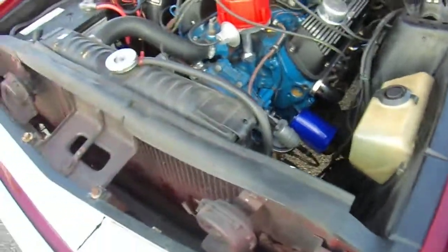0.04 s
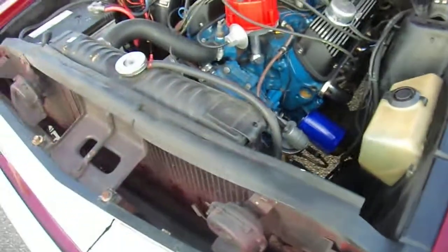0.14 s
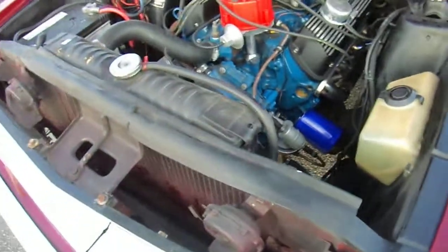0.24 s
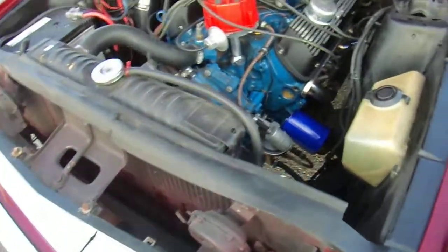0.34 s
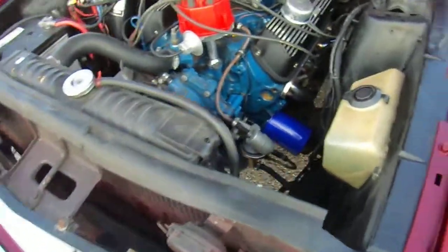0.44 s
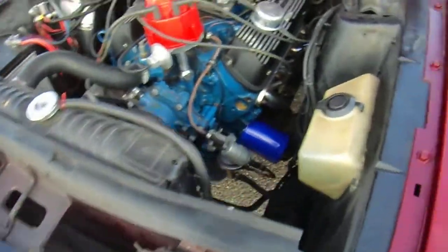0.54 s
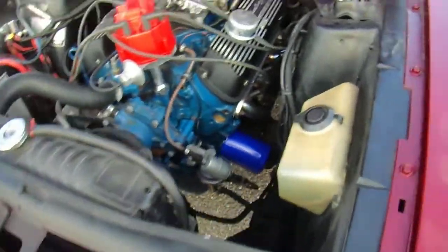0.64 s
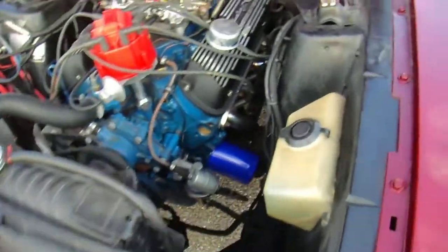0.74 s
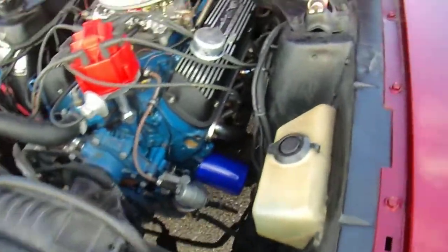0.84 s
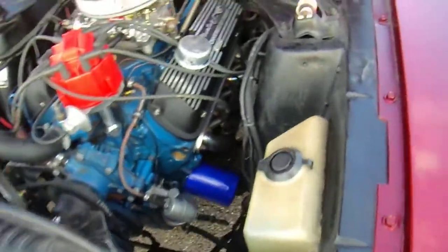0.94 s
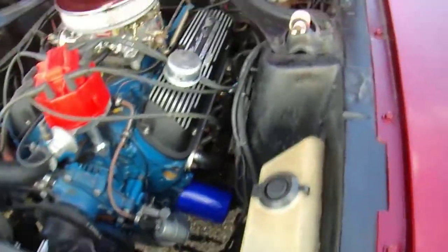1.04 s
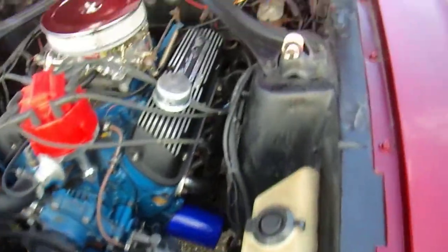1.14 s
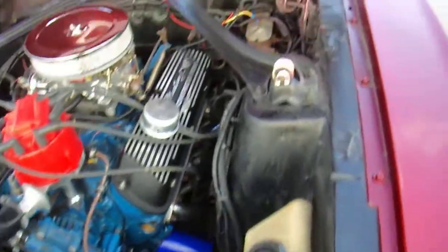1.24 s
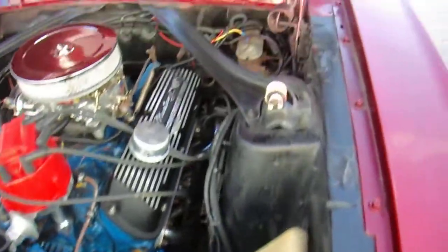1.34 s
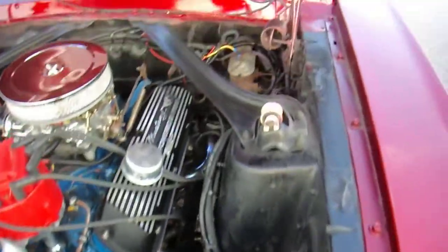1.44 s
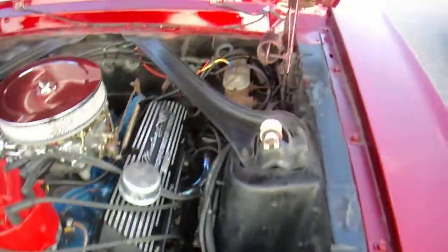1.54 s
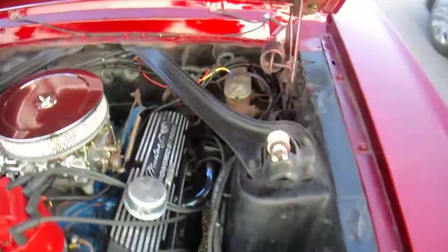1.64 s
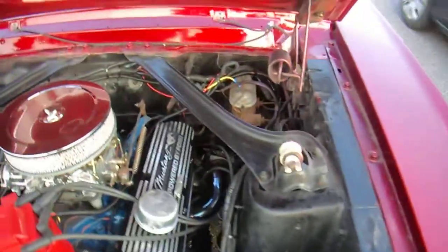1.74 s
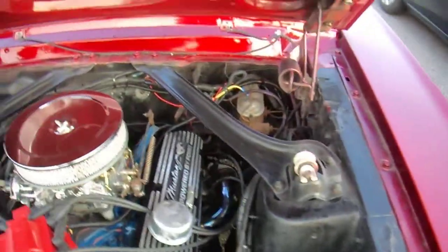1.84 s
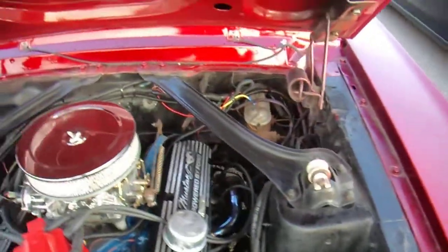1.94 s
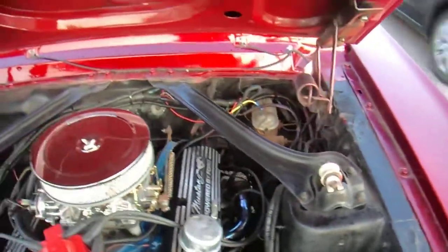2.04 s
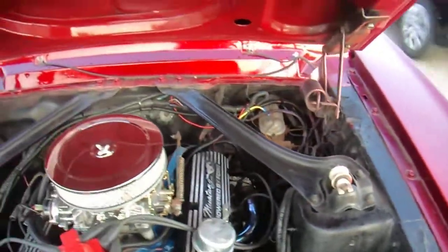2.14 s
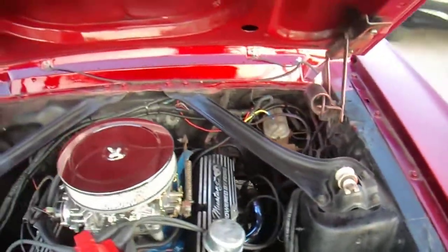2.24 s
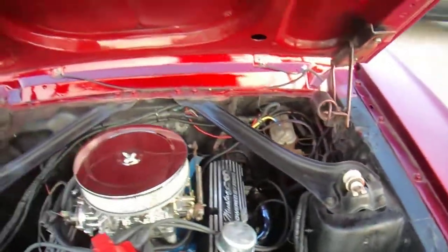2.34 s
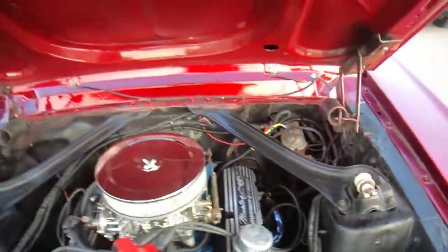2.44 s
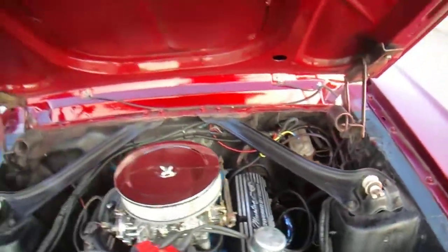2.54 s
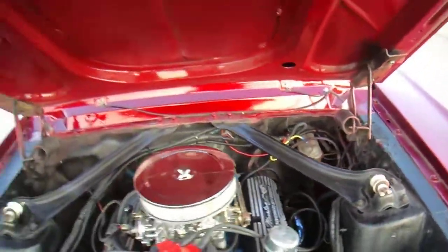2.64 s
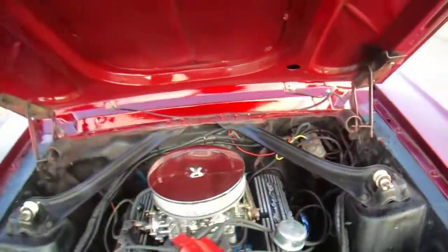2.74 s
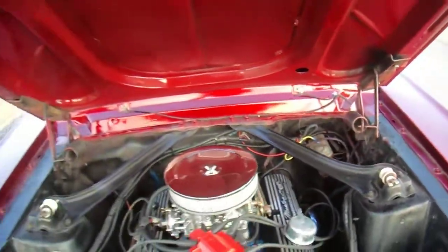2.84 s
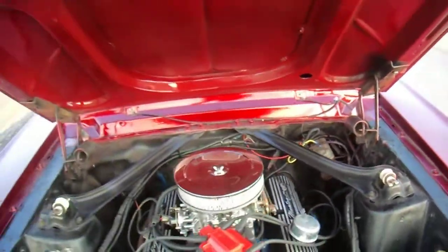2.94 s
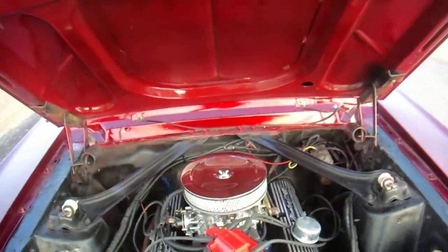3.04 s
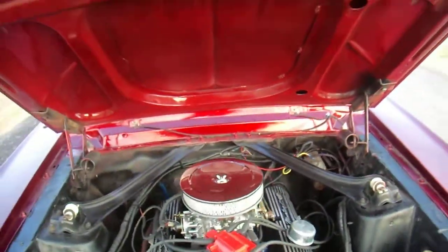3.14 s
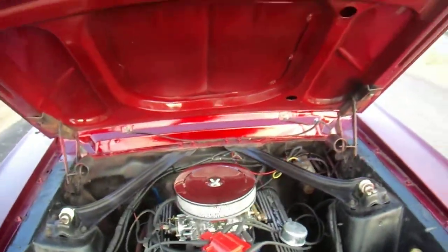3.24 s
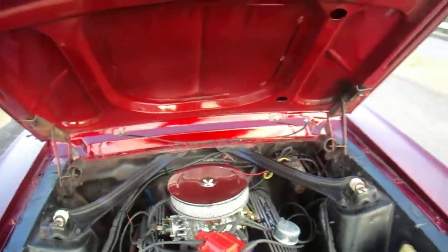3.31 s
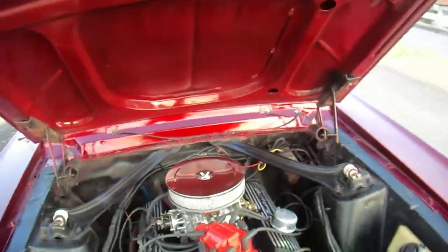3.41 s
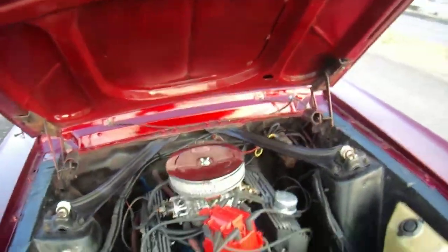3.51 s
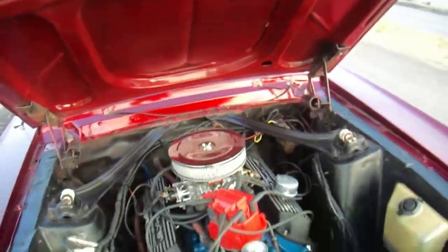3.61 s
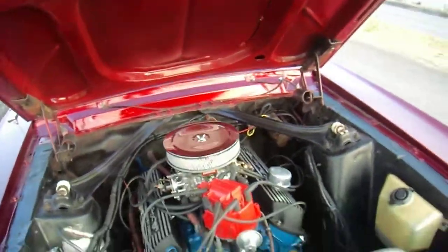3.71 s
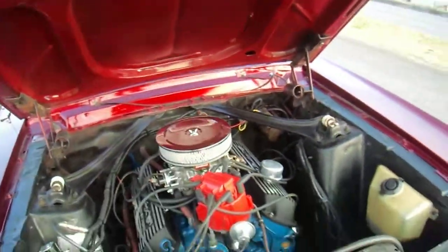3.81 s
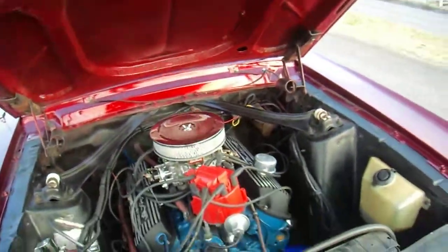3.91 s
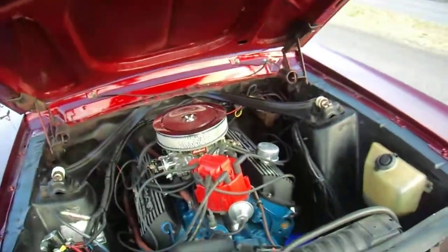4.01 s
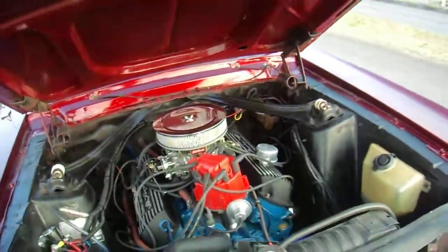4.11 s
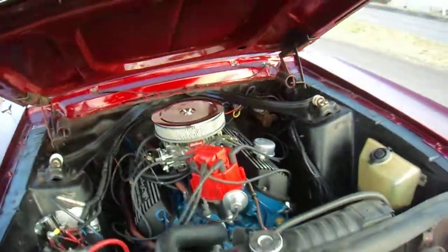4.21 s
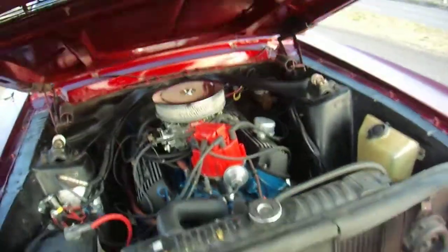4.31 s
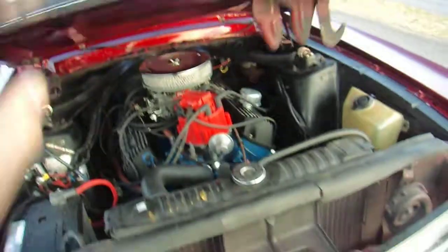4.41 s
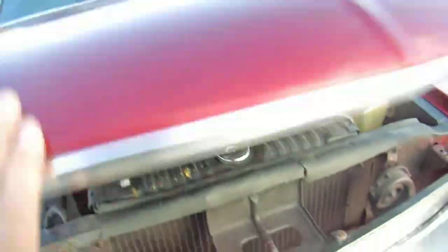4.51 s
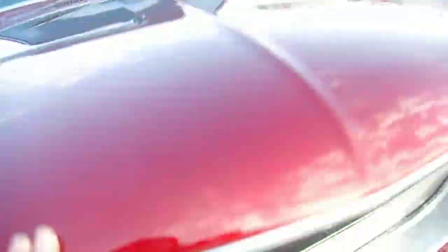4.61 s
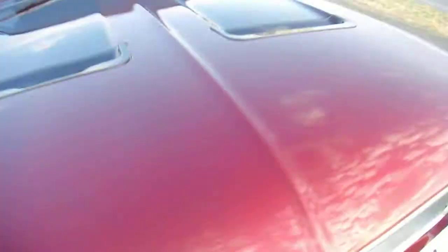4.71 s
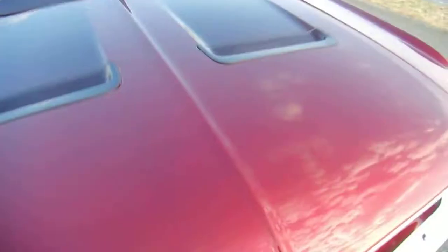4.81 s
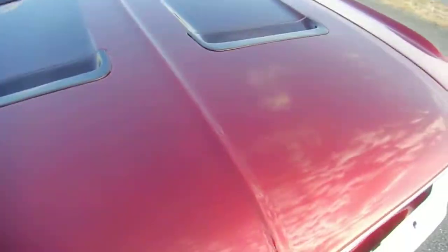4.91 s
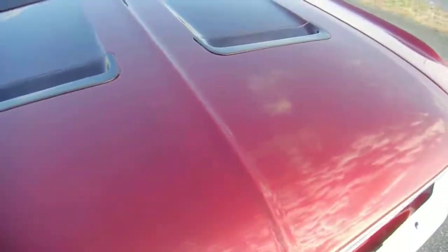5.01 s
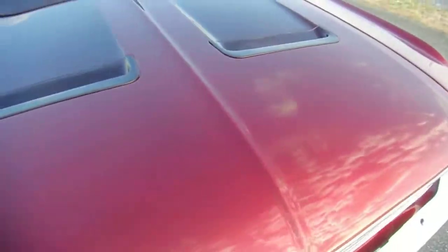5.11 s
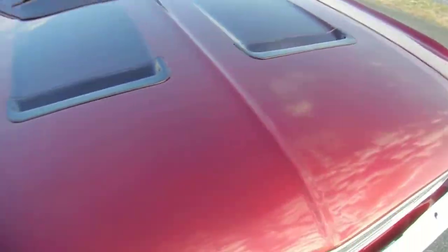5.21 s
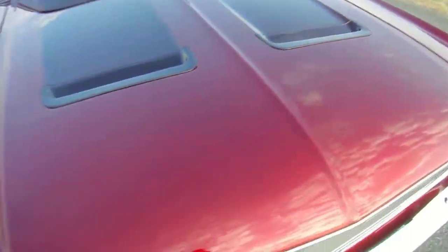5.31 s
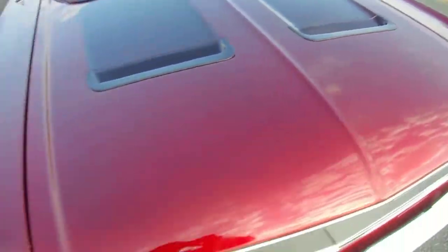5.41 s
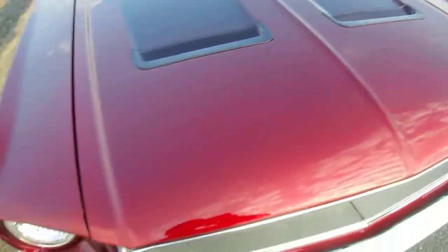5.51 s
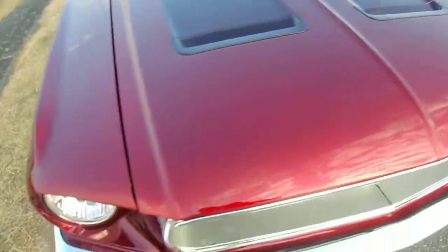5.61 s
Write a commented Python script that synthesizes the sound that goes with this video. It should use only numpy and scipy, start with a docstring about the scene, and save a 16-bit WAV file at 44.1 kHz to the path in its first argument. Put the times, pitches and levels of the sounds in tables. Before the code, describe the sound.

Quiet street ambience with muffled low rumble on a hand-held camera. One sharp tick comes early while a car passes with a smooth whooshing roar and low engine drone, then recedes. Low thuds from handling lead into a gritty, squeaky hinge creak, then a violent close sheet-metal slam: several clattering impacts in quick succession, a heavy air thump, body shudder, fast decay and a few loose ticks over faint traffic.

```python
"""A steel car hood slams onto its latch: bursts of noise ring the panel, air thumps and the body shudders.
First its sprung hinges creak as it falls: noise rubbed in uneven slips, with narrow resonances squealing.
Outdoors a vehicle drones past in shaped noise and gliding tones, and traffic hums far off.
Wind and handling rumble low in the microphone of a hand-held camera, small metal parts tick in short
pitched bursts, and the slam overloads the preamp."""
import sys
import numpy as np
from scipy import signal
from scipy.fft import rfft, irfft, next_fast_len
from scipy.io import wavfile
from scipy.ndimage import uniform_filter1d, map_coordinates

SR = 44100
rng = np.random.default_rng(int(sys.argv[2]) if len(sys.argv) > 2 else 0)


def file_out(sig):
    """Save sig as 16-bit WAV at sys.argv[1]."""
    # one column per channel
    cols = np.atleast_2d(sig).T
    # limit, then scale
    lim = np.clip(cols, -1, 1)
    pcm = np.round(lim * 32767).astype(np.int16)
    wavfile.write(sys.argv[1], SR, pcm)


def nominal_scale(level):
    """Amplitude ratio for a level in decibels (scalar or array-like)."""
    x = np.asarray(level, float) / 20
    return 10 ** x


N = 249606
T = np.arange(N) / SR  # seconds

# Noise colours of the street, before levelling to rms 1: freq_hz, density_db (per Hz)
RUMBLE_COLOUR = [(12, -37.5), (20, -2), (32, -3.5), (59, -2), (160, -13.5), (210, -29.5), (350, -120)]
DRONE_COLOUR = [(53, -30.5), (90, -1), (167, -0.5), (220, 0.5), (263, -2.5), (340, -5), (397, -12.5),
                (433, -16.5), (700, -12.5), (910, -43.5), (1540, -120)]
ROAR_COLOUR = [(240, -18), (400, 1.5), (436, 0.5), (602, -1), (768, -2.5), (1190, -2), (1380, -3.5),
               (1920, -5.5), (2220, -9.5), (2860, -7), (3200, -16), (4160, -32), (7040, -120)]
HISS_COLOUR = [(1880, -30.5), (3200, -2.5), (4120, -6.5), (4590, -6.5), (5110, -9), (5890, -15.5),
               (6300, -30), (8190, -69.5), (13900, -120)]
# A vehicle nears, passes and recedes; the shut hood screens the street: time_s, tyre_roar_db
PASS = [(0, -40.5), (.3, -39.5), (.6, -38.5), (.85, -36), (1.15, -33.5), (1.65, -33), (1.93, -34.5),
        (2.3, -38.5), (2.55, -41.5), (3.04, -45), (3.8, -47), (4.36, -45.5), (5.12, -46), (5.3, -52.5),
        (5.66, -53)]
# Wind and handling at the microphone: time_s, rumble_db
WIND = [(0, -36.5), (.45, -40.5), (.84, -42), (1.3, -37.5), (1.9, -33), (2.3, -35), (2.9, -39.5),
        (3.56, -33.5), (3.8, -40.5), (4.36, -41.5), (5.12, -36), (5.25, -58), (5.52, -42.5), (5.66, -60)]
# Narrow bands that swell and fade within the roar: centre_s, half_length_s, pitch_hz, width_hz, peak_db
SWELLS = [(0.207, 0.33, 1180, 250, -45), (1.461, 0.16, 1125, 250, -40), (1.778, 0.1, 1150, 250, -36),
          (2.598, 0.14, 1175, 250, -48.5), (3.206, 0.23, 1167, 250, -51), (1.2, 0.34, 2790, 290, -50.5),
          (2.002, 0.18, 2750, 290, -49.5), (2.372, 0.16, 2890, 250, -47.5), (3.4, 1, 2766, 290, -62),
          (.6, .2, 280, 40.4, -42), (1.1, 0.3, 599, 100, -47.5), (1.903, 0.17, 583, 100, -42),
          (2.697, .3, 595, 100, -54), (5.292, 0.36, 581, 100, -52.5)]
# Engine notes, mostly sinking as the vehicle goes by: start_s, end_s, first_hz, last_hz, level_db
ENGINE_NOTES = [(0.343, 0.794, 45.16, 44.7, -34.5), (0.804, 2.3, 44.5, 34.6, -43),
                (0.752, 1.543, 233.7, 196.5, -38.5), (0.902, 1.494, 178, 154.4, -41),
                (1.295, 2.287, 232.3, 233.6, -42), (1.452, 2.298, 72, 66.6, -35),
                (1.6, 2.307, 140.3, 136.1, -42)]
# A wavering hum far off: start_s, end_s, first_hz, last_hz, level_db
FAR_HUM = [(2.905, 4.4, 235.8, 227, -48.5), (4.45, 4.898, 209, 202.7, -42), (4.9, 5.664, 204.8, 198, -48)]
# Low bumps on the camera body: time_s, peak_db, pitch_hz
BUMPS = [(0.118, -21, 63.6), (0.24, -27, 50.7), (2.788, -26.5, 38.7), (2.849, -25.5, 59.2),
         (3.105, -22, 52.3), (3.423, -28, 88.8), (3.433, -22, 65), (3.455, -16.5, 145), (3.518, -34, 40.6),
         (3.708, -25, 56)]
# Small metal ticks: time_s, peak_db, pitch_hz, width_hz, length_s
TICKS = [(.5408, -17, 2610, 800, 0.0021), (2.79, -49, 4570, 200, .01), (3.296, -40, 3540, 300, .008),
         (3.297, -39, 5200, 900, 0.0088), (3.302, -39, 2680, 500, .006), (3.369, -41, 3000, 900, .005),
         (3.471, -41, 3330, 396, 0.011), (3.473, -45, 4270, 600, .009), (4.828, -25.5, 3000, 2500, 0.0072),
         (5.05, -34, 4770, 1500, 0.0089), (5.25, -36, 3500, 2500, 0.0039),
         (5.2526, -22.5, 2650, 1500, 0.0024), (5.2568, -19.5, 2470, 1600, 0.0022),
         (5.334, -45, 4000, 2500, .008), (5.502, -41.5, 4380, 2000, 0.012), (5.535, -48, 5000, 300, .01)]
# Duller knocks: time_s, peak_db, length_s
KNOCKS = [(0.541, -17, 0.0027), (0.553, -22.5, 0.0068), (4.827, -35, .006)]
# Tone of the dull knocks: freq_hz, gain_db
KNOCK_TONE = [(400, -18), (700, 10), (1000, -8), (1500, -42)]
# Hinges rubbing as the hood falls: time_s, level_db
HINGE_RUB = [(4.33, -54), (4.38, -43), (4.445, -32.5), (4.48, -32), (4.57, -36), (4.6, -31.5), (4.66, -34),
             (4.74, -34), (4.855, -35.5)]
# Noise colour of the rubbing: freq_hz, density_db (per Hz)
RUB_COLOUR = [(180, -44), (300, -7.5), (546, -5), (864, -1.5), (1050, -6.5), (1370, -5), (2160, -9.5),
              (2680, -12), (4700, -27), (6300, -38.5), (8190, -88), (13900, -120)]
# Bouts in which one hinge arm or spring sings: start_s, end_s, pitch_hz, level_db
SQUEALS = [(4.36, 4.485, 858, -40), (4.43, 4.5, 3710, -42), (4.427, 4.514, 2656, -36.5),
           (4.44, 4.585, 2040, -38), (4.432, 4.58, 4390, -49.5), (4.434, 4.51, 1390, -33.5),
           (4.457, 4.517, 618, -33.5), (4.501, 4.593, 1247, -37.5), (4.557, 4.68, 873, -35),
           (4.57, 4.66, 1777, -36), (4.587, 4.7, 3660, -51), (4.6, 4.75, 2680, -38),
           (4.662, 4.737, 1425, -39), (4.728, 4.816, 830, -39), (4.776, 4.826, 2340, -38),
           (4.79, 4.824, 1920, -34.5), (4.5, 4.56, 3030, -48)]
# Contacts of the slam, latch first, then rubber stops and a rebound:
# time_s, level_db, brightness_db (per octave above 1 kHz)
BLOWS = [(4.8579, -5.5, 4), (4.863, -2.5, 0), (4.8715, -14.5, -6), (4.8838, -4, 3.5), (4.8968, -2, -0.5),
         (4.902, -7.5, -1), (4.907, -11.5, 0), (4.915, -15, -1.5), (4.922, -20.5, -0.5),
         (4.936, -24.5, -4.5), (4.95, -33.5, -2), (4.978, -35, -13)]
# Broad noise colour of a blow: freq_hz, density_db (per Hz)
CRASH_COLOUR = [(40, -32), (90, -10), (200, -3.5), (330, 2), (600, -3), (1100, -5.5), (1800, -2.5),
                (2400, -8), (3300, -7), (4900, -15.5), (6300, -28.5), (8000, -70)]
# Resonances of the sheet steel over its broad crash: pitch_hz, width_hz, gain_db
PANEL = [(336, 26, 2), (527, 9, 1.5), (730, 21, -1), (927, 49, 0), (1230, 10, -22.5), (1390, 56, 7.5),
         (1600, 57, -6), (1775, 32, 2), (1980, 97, 0), (2350, 51, -1), (2770, 60, 7), (2940, 49, 3.5),
         (3000, 28, 0.5), (3540, 110, 7), (3815, 91, -14), (4440, 380, 6.5), (5060, 140, 0.5)]
# Air squeezed out of the engine bay and the body flexing: centre_s, pitch_hz, peak_db, rise_s, fall_s
THUMPS = [(4.8912, 120, 9, .004, .007), (4.905, 80, -10, .012, .02), (4.9168, 200, -7, .006, .005),
          (4.9375, 150, -14, .004, .006)]
# Dull shudder of the car body: freq_hz, density_db (per Hz)
BODY_COLOUR = [(24, -34), (40, -1.5), (81, -3), (124, 4), (212, 3.5), (286, -7), (382, -4), (570, -5.5),
               (800, -18), (1040, -48.5), (1760, -120)]
# Tail of engine bay and yard: freq_hz, t60_s
BAY_DECAY = [(60, 0.34), (200, 1), (1000, 0.37), (3000, 0.49), (6000, 0.46)]


def unit(x):
    """Bring to rms 1."""
    return x / np.sqrt(np.mean(x ** 2) + 1e-20)


def along(points, hz):
    """Read (Hz, value) points on a log frequency axis."""
    f, v = np.transpose(points)
    return np.interp(np.log(hz + 1), np.log(f + 1), v)


def curves(rows):
    """One value per sample for each column after the time."""
    s, *cols = np.transpose(rows)
    return [np.interp(T, s, c) for c in cols]


def wobble(rate):
    """A smooth random curve, rate knots a second."""
    return map_coordinates(rng.standard_normal(int(N * rate / SR) + 4), [T * rate])


def filtered(x, response):
    """x times a complex response of frequency."""
    m = next_fast_len(len(x) + SR // 2)
    return irfft(rfft(x, m) * response(np.fft.rfftfreq(m, 1 / SR)), m)[:len(x)]


def band(x, hz, width):
    """x through one resonance, brought to rms 1."""
    return unit(filtered(x, lambda f: 1j * f * width / (hz * hz - f * f + 1j * f * width)))


def rush(colour, patchy_db, tilt_db=0):
    """Noise levelled to rms 1, then given patches of random gain and a moving treble slope."""
    noise = unit(filtered(rng.standard_normal(N), lambda hz: nominal_scale(along(colour, hz))))
    hz, t, z = signal.stft(noise, SR, nperseg=512)
    patches = uniform_filter1d(rng.standard_normal(z.shape), size=4, axis=0)
    patches = unit(uniform_filter1d(patches, size=12, axis=1))
    octaves = np.log2(np.maximum(hz, 1000) / 1000)[:, None]  # above 1 kHz
    slope = octaves * np.interp(t, T, tilt_db + 0 * T)
    return signal.istft(z * nominal_scale(patchy_db * patches + slope), SR, nperseg=512)[1][:N]


def tone(start, end, first_hz, last_hz, db, waver_hz, flutter_db):
    """An unsteady gliding sine that fades in and out over 0.12 s."""
    hz = np.interp(T, [start, end], [first_hz, last_hz]) + waver_hz * wobble(12)
    fade = np.clip(np.minimum(T - start, end - T) / 0.12, 0, 1)
    flutter = unit(nominal_scale(flutter_db * wobble(14)))
    sine = np.sin(2 * np.pi * np.cumsum(hz) / SR)
    return np.sqrt(2) * fade * nominal_scale(db) * flutter * sine


def street():
    """Lumpy wind rumble, engine drone and notes, tyre roar with swelling bands, treble hiss and a far hum."""
    nearest_db = -33  # roar at the nearest point
    drone_db, drone_follows = -35.5, 0.59  # at the nearest point; dB per dB of roar
    # treble fades faster with distance, down to a far hiss
    hiss_db, hiss_follows, far_hiss_db = -44, 1.78, -60.5
    (roar_db,), (rumble_db,) = curves(PASS), curves(WIND)
    away_db = roar_db - nearest_db

    gust = wobble(12)  # sways rumble and drone together
    rumble = nominal_scale(rumble_db + 0.5 * gust) * rush(RUMBLE_COLOUR, patchy_db=1.87)
    drone_level_db = drone_db + drone_follows * away_db + 1.0 * gust + 0.29 * wobble(37)
    drone = nominal_scale(drone_level_db) * rush(DRONE_COLOUR, patchy_db=0.5)
    roar = nominal_scale(roar_db + 0.74 * wobble(12)) * rush(ROAR_COLOUR, patchy_db=0.15)
    hiss_level = np.hypot(nominal_scale(hiss_db + hiss_follows * away_db), nominal_scale(far_hiss_db))
    hiss = hiss_level * nominal_scale(0.6 * wobble(7.2)) * rush(HISS_COLOUR, patchy_db=1.34)

    air = rng.standard_normal(N) * nominal_scale(2.1 * wobble(25))
    bands = 0
    for s, half, hz, width, db in SWELLS:
        swell = nominal_scale(db - 5.3 * ((T - s) / half) ** 2)
        bands = bands + swell * band(band(air, hz, width), hz, width)
    notes = sum(tone(*row, waver_hz=1.5, flutter_db=2.5) for row in ENGINE_NOTES)
    hum = sum(tone(*row, waver_hz=6, flutter_db=3) for row in FAR_HUM)
    return rumble + drone + roar + hiss + bands + notes + hum


def bumps():
    """Each bump on the camera body is a short low sine swing under a bell-shaped envelope."""
    out = np.zeros(N)
    for s, db, hz in BUMPS:
        cycles = (T - s) * hz
        out += nominal_scale(db - 54 * (cycles / 1.14 - 0.6) ** 2) * np.sin(2 * np.pi * cycles)
    return out


def burst(t, life):
    """Noise with a quick onset, falling 8.7 dB in each life (s), which is held to 1 ms or more."""
    onset = 1 - np.exp(-t / 0.00043)
    return rng.standard_normal(len(t)) * nominal_scale(-8.7 * t / max(life, 0.001)) * onset


def settling():
    """Loose parts tick at random around the end of the slam, the later ones weaker; rows as in TICKS."""
    spread_s, loudest_db, fall_db_per_s = 0.39, -30, 54
    rows = []
    for u, v, w in rng.random((36, 3)):
        s = BLOWS[-1][0] + spread_s * (u - 0.1)
        db = loudest_db - fall_db_per_s * spread_s * u - 6 * v
        rows.append((s, db, 2415 + 1750 * w, 1800, 0.008))
    return rows


def ticks():
    """Small metal parts tick in short bursts, each around its own pitch, among duller knocks."""
    out, t = np.zeros(N + SR), np.arange(4096) / SR
    for s, db, pitch, width, life in TICKS + settling():
        bright = band(burst(t, life), pitch, width)
        bright = band(band(bright, pitch, 2 * width), pitch, 2 * width)
        out[round(s * SR):][:len(t)] += nominal_scale(db) * bright / abs(bright).max()
    for s, db, life in KNOCKS:
        dull = filtered(burst(t, life), lambda hz: nominal_scale(along(KNOCK_TONE, hz)))
        out[round(s * SR):][:len(t)] += nominal_scale(db) * dull / abs(dull).max()
    return out[:N]


def hinge():
    """Uneven stick-slip rubbing, about a hundred slips a second, sets the springs squealing in bouts."""
    full_tilt_db, brightens = 2, 0.28  # dB per octave above 1 kHz at full rubbing; its loss per dB of level
    squeal_q = 40
    level_db, = curves(HINGE_RUB)
    slips = unit(nominal_scale(0.82 * wobble(190)))
    tilt_db = full_tilt_db + brightens * (level_db - level_db.max())
    rub = nominal_scale(level_db) * slips * rush(RUB_COLOUR, patchy_db=1.5, tilt_db=tilt_db)
    rubbing = (T > HINGE_RUB[0][0]) * (T < HINGE_RUB[-1][0] + 0.01)

    grit = slips * rng.standard_normal(N)
    squeal = 0
    for start, end, hz, db in SQUEALS:
        bout = np.clip(np.minimum(T - start, end - T) / 0.031, 0, 1)
        width = hz / squeal_q
        squeal = squeal + nominal_scale(db) * bout * band(band(grit, hz, 2 * width), hz, width)
    return rubbing * rub + slips * squeal  # the slips make the squeal hoarse


def steel(f):
    """Response of the sheet steel: the broad crash passes straight, with the panel resonances on top."""
    return 1 + sum(nominal_scale(db) * 1j * f * w / (c * c - f * f + 1j * f * w + 1e-9) for c, w, db in PANEL)


def blows():
    """Each contact is a decaying noise burst with its own brightness; weak rebounds ring longer."""
    out, t = np.zeros(N + SR), np.arange(SR // 2) / SR
    for s, db, tilt_db in BLOWS:
        t60 = 0.062 * np.exp(-0.06 * (db + 7.5))  # seconds
        colour = lambda hz: nominal_scale(along(CRASH_COLOUR, hz) + tilt_db * np.log2(np.maximum(hz, 1000) / 1000))
        rattle = unit(filtered(rng.standard_normal(len(t)), colour))
        out[round(s * SR):][:len(t)] += nominal_scale(db - 60 * t / max(t60, 0.01)) * rattle
    return out[:N]


def bay(x):
    """Reverberant noise tail of bay and yard, in which each frequency dies at its own speed."""
    hz, t, z = signal.stft(rng.standard_normal(SR), SR, nperseg=512)
    tail = signal.istft(z * nominal_scale(-60 * t / along(BAY_DECAY, hz)[:, None]), SR, nperseg=512)[1]
    return signal.fftconvolve(x, tail / np.linalg.norm(tail))[:N]


def thumps():
    """Squeezed air and the flexing body push out low swings, each with its own rise and fall."""
    out = np.zeros(N)
    for s, hz, db, rise, fall in THUMPS:
        shape = nominal_scale(db - 7.1 * ((T - s) / np.where(T < s, rise, fall)) ** 2)
        out += shape * np.cos(2 * np.pi * hz * (T - s))
    return out


def shudder():
    """The car body shakes as dull noise from the first thump on, dying by 60 dB in 0.42 s."""
    since = T - THUMPS[0][0]
    return (since > 0) * nominal_scale(-14 - 60 * abs(since) / 0.42) * rush(BODY_COLOUR, patchy_db=3)


def slam():
    """The contacts rattle the panel and its resonances; air thumps, the body shudders and the bay rings on."""
    chatter = nominal_scale(2.6 * wobble(120))  # loose parts knock against the panel
    metal = filtered(chatter * blows(), steel)
    return metal + nominal_scale(-23) * chatter * bay(metal) + shudder() + thumps()


def scene():
    """The hood close by, the street around it."""
    return (slam() + hinge() + ticks() + bumps() + street())[None]


def roll_off(x):
    """The treble ends steeply here."""
    return signal.sosfilt(signal.butter(12, 16520, fs=SR, output="sos"), x)


def record(dry):
    """The preamp saturates, a steep filter cuts the treble, and its overshoot clips hard."""
    saturated = dry[0] / (1 + abs(dry[0] / 0.685) ** 8) ** (1 / 8)
    dulled = filtered(saturated, lambda hz: 1 / (1 + (hz / 5570) ** 24))
    offset = 0.0063 * (T > BLOWS[0][0])  # left slightly off centre from the first blow on
    clipped = np.clip(dulled - offset, -0.715, 0.715)
    return roll_off(clipped[None])


dry = scene()
out = record(dry)
file_out(out)
```